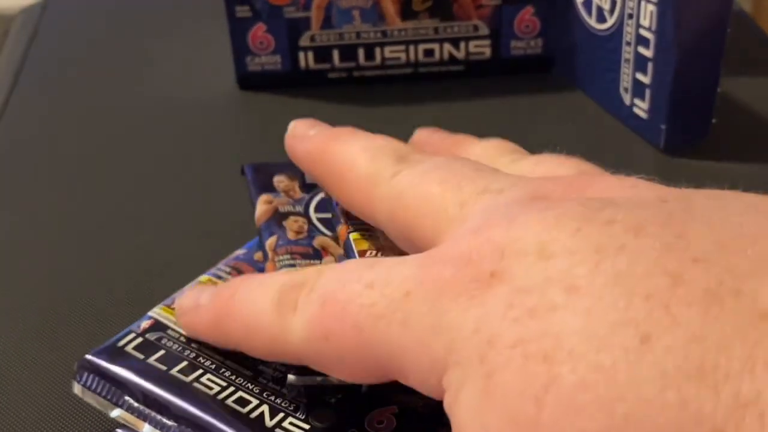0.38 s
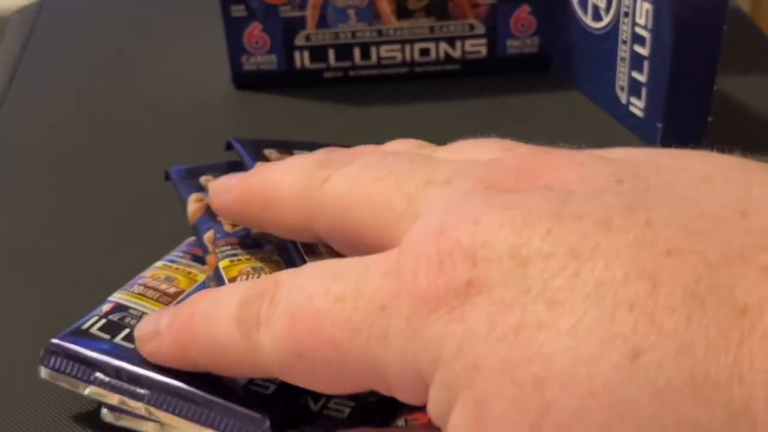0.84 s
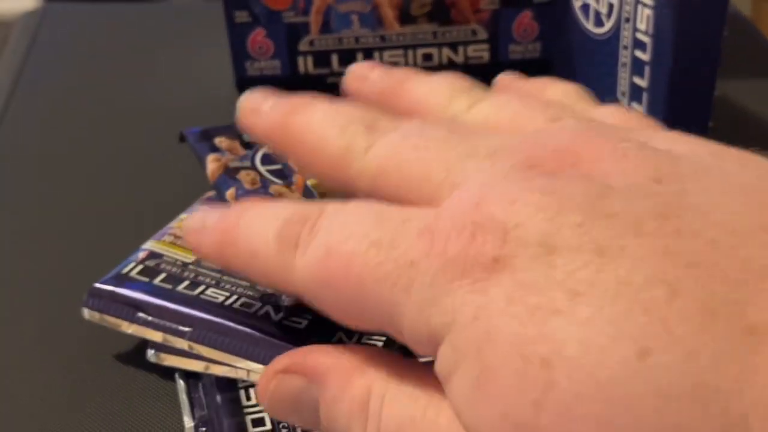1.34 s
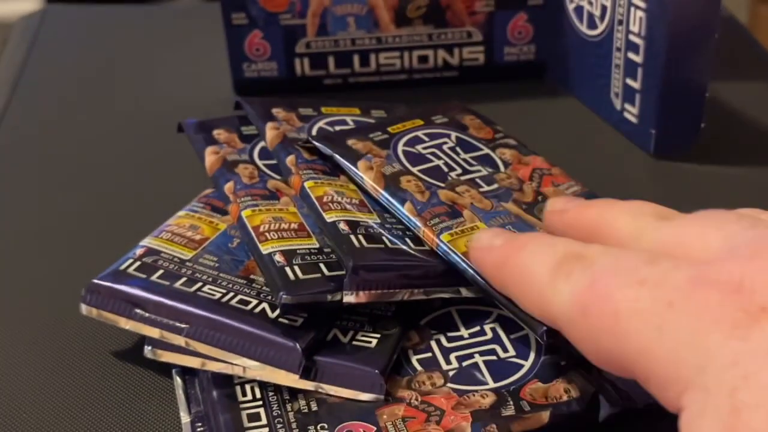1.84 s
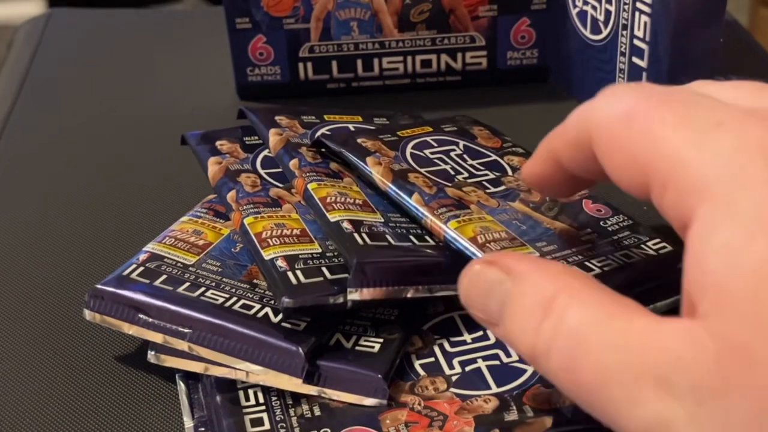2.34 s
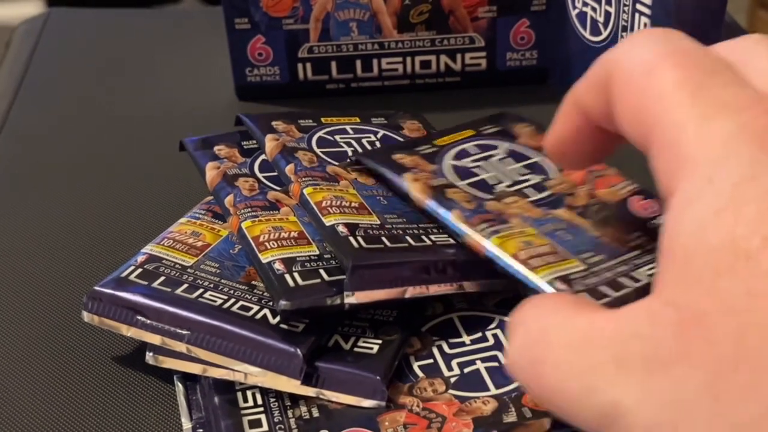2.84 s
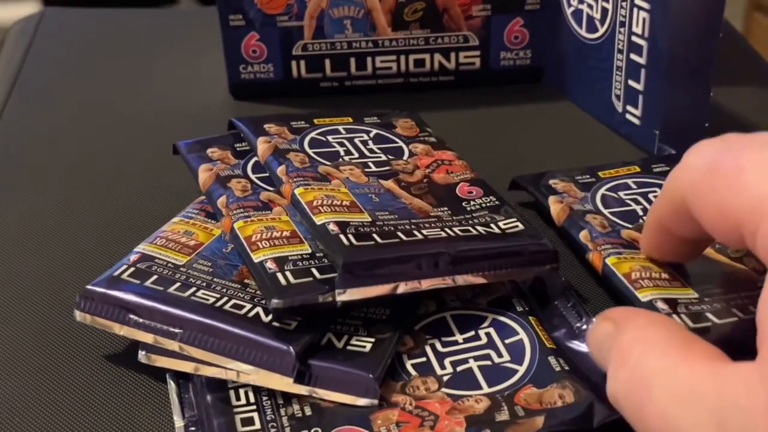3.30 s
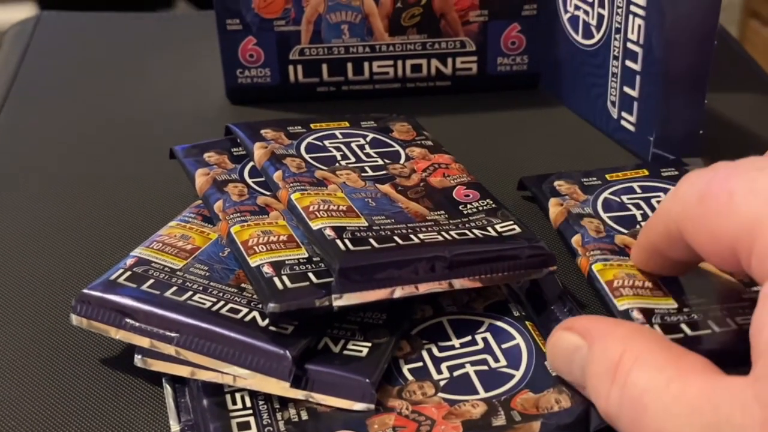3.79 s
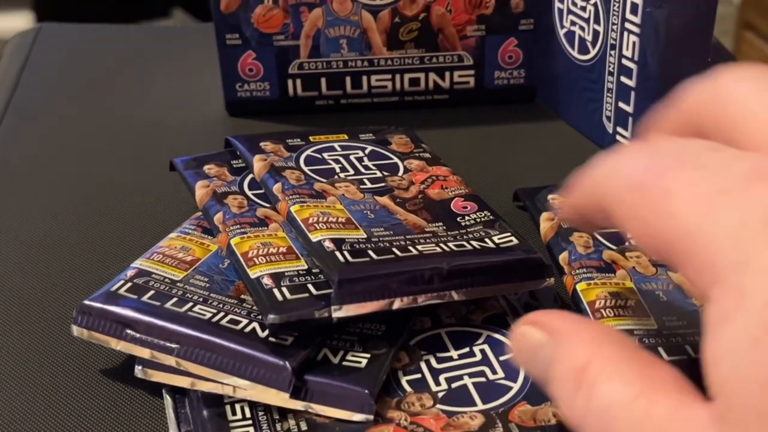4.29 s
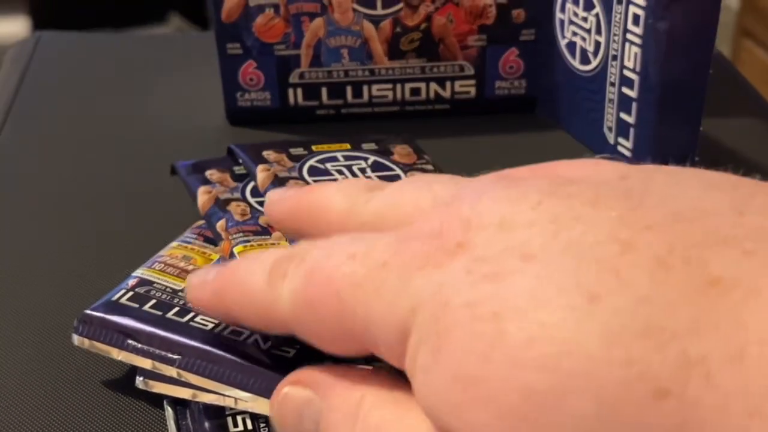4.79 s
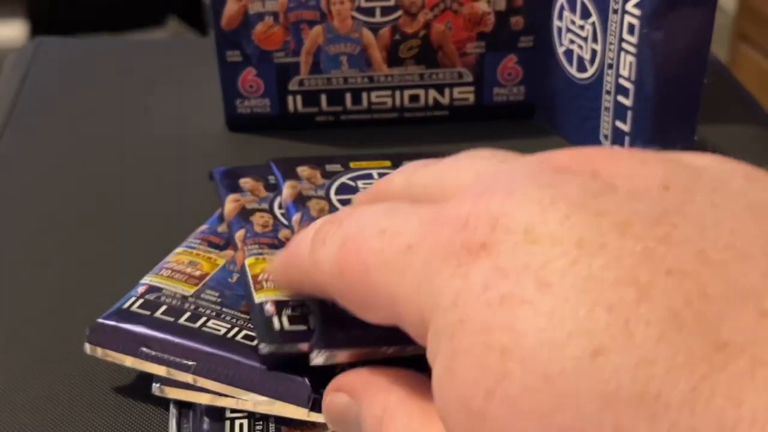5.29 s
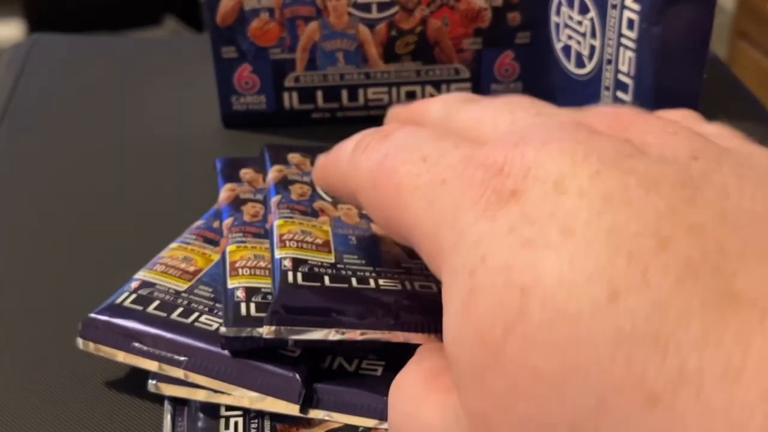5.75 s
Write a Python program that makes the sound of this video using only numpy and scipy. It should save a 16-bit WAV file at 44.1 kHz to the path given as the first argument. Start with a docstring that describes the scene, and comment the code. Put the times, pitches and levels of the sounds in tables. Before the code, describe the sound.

Close up in a quiet room, a hand rubs and shuffles a pile of foil packs. Dense crinkling and bright snaps come first, then thin out to sparse rustles; a pack lands with a soft knock around three seconds, near-silence follows, and moderate crinkling returns at the end. Faint low room rumble throughout, close stereo microphone.

```python
"""A hand presses, shuffles and slides foil-wrapped card packs on a rubber mat in a quiet room.
Skin, foil and mat rub with a hiss of shaped noise; creases in the foil snap as brief rings and noise bursts.
Packs land and the hand pats the pile: clicks set the modes of pack, mat and table ringing.
A rubbing pack squeaks in faint wavering tones; filtered noise makes the room's rumble and a hum.
Two microphone ports close together pick it up, with short diffuse echoes and a faint hiss between strokes."""
import sys
import numpy as np
from scipy import signal
from scipy.fft import rfft, irfft
from scipy.io import wavfile

SR = 44100
rng = np.random.default_rng(int(sys.argv[2]) if len(sys.argv) > 2 else 0)


def volts_from_decibels(level):
    """Turn decibel levels (scalar or array-like) into linear amplitude factors."""
    exponent = np.asarray(level, float) / 20
    return 10 ** exponent


def wrap_up_sound(samples):
    """Save the sound to the file named by the first command line argument, as 16-bit audio."""
    columns = np.atleast_2d(samples).T
    # keep every value between -1 and 1, then stretch to whole-number steps
    tamed = np.clip(columns, -1, 1)
    steps = np.round(tamed * 32767).astype(np.int16)
    wavfile.write(sys.argv[1], SR, steps)


N = 259749   # length [samples]
FIRM_DB = -48   # rubbing level that counts as firm
ROOM_DB = -28.5   # echoes re direct sound


def rms_one(x):
    """Scale to unit rms."""
    return x / np.sqrt(np.mean(x ** 2) + 1e-20)


def band(x, low_hz, high_hz):
    """Band-pass."""
    edges_hz = [low_hz, min(high_hz, .45 * SR)]
    return signal.sosfilt(signal.butter(2, edges_hz, "band", fs=SR, output="sos"), x)


def at_hz(points, column):
    """A table column on the FFT grid, straight on a log-frequency axis."""
    hz = np.maximum(np.arange(N // 2 + 1) * SR / N, 1)
    points = np.array(points)
    return np.interp(np.log(hz), np.log(points[:, 0]), points[:, column])


def drift(rate_hz):
    """Slow chance of unit rms: noise through a double low-pass."""
    r = np.exp(-2 * np.pi * rate_hz / SR)
    slow = signal.lfilter([1], [1, -2 * r, r * r], rng.standard_normal(N + SR))
    return rms_one(slow[SR:])   # skips the first second, while the filter settles


def ring(clicks, hz, t60):
    """A unit click sets a decaying sine of height 1 ringing, as in a struck resonance."""
    r = volts_from_decibels(-60 / (t60 * SR))
    w = 2 * np.pi * hz / SR
    return signal.lfilter([0, np.sin(w)], [1, -2 * r * np.cos(w), r * r], clicks + 1e-18)


def swell(t, rise_s, fall_s):
    """Exponential rise to 1 at t = 0, exponential fall."""
    return np.exp(np.where(t < 0, t / rise_s, -t / fall_s))


def hand():
    """Strokes swell and fade and add in power over a faint steady hiss: level and treble, in dB."""
    # strokes of the hand: (time of peak [s], rubbing level [dB], rise [ms], fall [ms],
    # treble re rubbing [dB])
    strokes = [(0.031, -46.5, 32, 31, -7), (0.128, -59.5, 184, 28, -3), (0.195, -64, 57, 21, -3),
               (0.264, -57.5, 67, 39, -10), (0.355, -53, 20, 54, -10), (0.407, -49.5, 29, 52, -10.0),
               (0.48, -42, 20, 51, -8.0), (0.571, -46, 57, 57, -9), (0.63, -37.5, 34, 55, -13),
               (0.72, -47.5, 40, 34, -11), (0.778, -42.5, 28, 49, -18), (0.868, -44.5, 21, 56, -6),
               (0.966, -48.5, 34, 24, -12), (1.014, -43, 58, 27, -8), (1.116, -42.5, 48, 47, -11),
               (1.208, -46, 18, 57, -10.0), (1.295, -53.5, 30, 42, -9), (1.386, -54.5, 17, 42, -11),
               (1.475, -62.5, 46, 85, -6), (1.634, -55, 93, 170, -11.5), (1.775, -55, 47, 31, -6.5),
               (1.884, -59.5, 100, 152, -1.5), (1.966, -54.5, 88, 28, -1), (2.05, -66.5, 21, 40, 8),
               (2.136, -59, 60, 75, -10.5), (2.306, -71.5, 100, 197, -0.5), (2.418, -58.5, 31, 77, -6),
               (2.565, -64.5, 24, 20, -9.0), (2.637, -58.5, 23, 67, -7.0), (2.728, -55.5, 18, 55, -3),
               (2.883, -66, 180, 304, 2.5), (2.972, -52.5, 35, 55, -2), (3.079, -43.0, 26, 15, -9),
               (3.135, -51.0, 47, 31, -11), (3.224, -57.5, 170, 39, -5.0), (3.363, -55.5, 40, 35, -3.5),
               (3.463, -80, 29, 26, -3), (3.53, -63.5, 24, 21, -21), (3.619, -68, 16, 20, -27),
               (3.729, -62.5, 11.5, 45, -9), (3.822, -69.5, 21, 16, -4), (3.878, -53, 22.3, 37, -3),
               (4.005, -68, 40, 20, -7.5), (4.11, -81, 32, 22, 0.5), (4.203, -66.5, 28, 44, -9.0),
               (4.436, -75.5, 65, 85, -1.5), (4.57, -57, 78, 200, -9), (4.74, -65, 123, 110, 1.5),
               (4.87, -68.5, 48, 104, 6), (4.917, -61.5, 76, 81, -7), (5.015, -47.5, 48, 27, -9),
               (5.111, -55.5, 60, 28, -6.0), (5.191, -46.5, 41, 31, -3), (5.326, -49.5, 116, 39, -1),
               (5.397, -52.5, 83, 32, -1), (5.502, -51, 63, 29, -2), (5.584, -57, 58, 34, -5.0),
               (5.681, -52, 37, 33, -6.5), (5.722, -70.5, 18, 56, -7.5), (5.888, -66, 66, 16, -9)]
    roundness = 1.5   # 1 = pointed strokes, 2 = bell-shaped
    edge_db = 10   # drop after one rise or fall time
    floor_db, floor_treble_db = -86.5, -6   # faint steady microphone hiss left between strokes; its treble re that
    t = np.arange(0, N + 32, 32) / SR
    s, db, rise_ms, fall_ms, treble_db = np.transpose(strokes)[:, :, None]
    side_ms = np.maximum(np.where(t < s, rise_ms, fall_ms), 8)
    away = 1000 * np.abs(t - s) / side_ms
    power = volts_from_decibels(2 * (db - edge_db * away ** roundness))
    level = power.sum(0) + volts_from_decibels(2 * floor_db)
    treble = (power * volts_from_decibels(2 * treble_db)).sum(0) + volts_from_decibels(2 * (floor_db + floor_treble_db))
    return [np.interp(np.arange(N) / SR, t, 10 * np.log10(p)) for p in (level, treble)]


def crackle(usual_per_s=400, fade_s=0.0012):
    """Tiny creases give way in clumps, each a dry broadband burst of a few milliseconds."""
    sizes = np.minimum(rng.exponential(1, N), 4)
    sizes = volts_from_decibels(0.0 * sizes)   # at 0 dB of spread all bursts are born alike
    born = rng.random(N) < usual_per_s * volts_from_decibels(5.0 * drift(25)) / SR
    t = np.arange(-150, 150) / SR
    bursts = signal.fftconvolve(sizes * born, swell(t, fade_s, fade_s), "same")
    return rms_one(bursts * rng.standard_normal(N))


def rubbing(level_db, treble_db, low_edge_hz=1650, treble_edge_hz=8000, trim_db=-1.0):
    """Skin, foil and mat slide on each other: a hiss in three registers that carries the fine crackle."""
    # microphone colour on the hiss, close by: (frequency [Hz], level [dB per Hz])
    colour = [(100, -36), (200, -8), (350, 6), (800, 1), (1200, -3), (1600, -0.5), (2200, -2.8),
              (2800, -5.5), (3500, -2.5), (5600, -10), (6500, -7.5), (8300, -10), (11700, -13.5),
              (15500, -14.5), (16300, -22)]
    firmer_db = level_db - FIRM_DB
    # the low register gains less from firmer rubbing, and comes and goes on its own
    low_db = level_db - 13.5 - 0.35 * firmer_db + 2 * drift(2.7)
    grain_db = np.maximum(1 + 0.6 * firmer_db, -7.0)   # crackle re hiss
    hiss = rng.standard_normal(N) * volts_from_decibels(1.3 * drift(35))   # flickers
    raw = hiss + volts_from_decibels(grain_db) * crackle()
    raw /= np.sqrt(1 + volts_from_decibels(2 * grain_db))
    hz = np.arange(N // 2 + 1) * SR / N
    low = 1 / (1 + (hz / low_edge_hz) ** 14)
    treble = 1 - 1 / (1 + (hz / treble_edge_hz) ** 6)
    shares = np.array([1 - low - treble, treble, low])   # the registers add up without gaps
    parts = irfft(rfft(raw) * volts_from_decibels(at_hz(colour, 1)) * shares, N)
    levels_db = [level_db, treble_db, low_db]
    return sum(volts_from_decibels(db + trim_db) * rms_one(part) for db, part in zip(levels_db, parts))


def background():
    """Building rumble in slow swells and a wavering hum (noise in a resonance), nearly alike at both ports."""
    # rumble of the room, relative: (frequency [Hz], level [dB per Hz])
    rumble_shape = [(12, -27), (20, -7.5), (49, 4.5), (75, 2.5), (121, -5.5), (172, -14), (264, -14),
                    (604, -37), (709, -32.5), (900, -27.5), (1170, -56.5), (1980, -120)]
    rumble_db, hum_db, hum_hz = -60, -71, 116.2
    mid, side = irfft(rfft(rng.standard_normal((2, N))) * volts_from_decibels(at_hz(rumble_shape, 1)), N)
    apart = band(side, 60, 1000) * volts_from_decibels(-14.0) * np.array([[1], [-1]])
    rumble = volts_from_decibels(rumble_db + 0.87 * drift(6.3)) * rms_one(mid + apart)
    hum = rms_one(ring(rng.standard_normal(N), hum_hz, 0.94))
    return rumble + volts_from_decibels(hum_db) * hum


def snaps(rows, usual_length_s=0.00079, spread=0.42, rasp=1.9, trim_db=(3.5, 3.5, -0.7, 3.5)):
    """A buckle runs along a crease for a millisecond: treble first, then the foil facets ring, the pack last."""
    out = np.zeros(N + 768)
    t = np.arange(768) / SR - .004
    chance = rng.standard_normal((len(rows), 2, 768))   # noise; its first values also serve as single draws
    for (s, peak_db, hz, treble_db, body_db), (a, b) in zip(rows, chance):
        length = usual_length_s * np.exp(0.18 * a[0])   # creases differ in length
        facet_hz = hz * np.exp(spread * b[:3])
        facets = sum(np.sin(2 * np.pi * facet_hz[k] * t + 3 * b[k + 4]) for k in range(3))
        tone = np.sin(2 * np.pi * hz * t + 3 * b[8]) + 0.15 * facets + rasp * band(b, 1840, 4240)
        main_ring = tone * np.exp(-(t / length) ** 2)
        upper_ring = band(a, 4300, 10000) * np.exp(-((t + 0.0001) / length) ** 2)
        treble = band(b, 4300, 13500) * np.exp(-((t + 0.00081) / length) ** 2)
        body = band(band(a, 630, 1090), 460, 1800) * swell(t - .0006, 0.00047, 0.0014)
        # the upper ring follows part of the treble's swing, with chance of its own
        upper_db = -4.5 + 0.57 * treble_db + 6.5 * a[1]
        parts = [main_ring, upper_ring, treble, body]
        i = round(s * SR) - round(-t[0] * SR)
        for part, db, trim in zip(parts, [0, upper_db, treble_db, body_db], trim_db):
            out[i:i + 768] += volts_from_decibels(peak_db + db + trim) * part / np.abs(part).max()
    return out[:N]


def small_snaps(level_db, count=360, firm_per_s=45):
    """Lesser creases give way at random, more often (up to firm) and louder the firmer the rubbing."""
    when, luck, pitch = rng.random((count, 3)).T
    size, treble, body = rng.standard_normal((count, 3)).T
    s = .01 + when * (N / SR - .03)
    here_db = level_db[(s * SR).astype(int)]
    peak_db = here_db + 5.5 + 3.0 * size
    ring_hz = 1900 * 2.4 ** pitch
    rows = np.transpose([s, peak_db, ring_hz, -15 + 5.4 * treble, -17 + 2.4 * body])
    rate_per_s = firm_per_s * np.minimum(volts_from_decibels(2 * (here_db - FIRM_DB)), 1)
    return snaps(rows[luck * count * SR / N < rate_per_s])


def knocks(contact_hz=1500, trim_db=-3.5):
    """Each soft blow strikes every mode with a strength of its own; a hand on the pack shortens the ring."""
    # a pack lands and bounces, the hand pats the pile, before trim:
    # (time [s], peak level [dB], freedom to ring [0-1])
    blows = [(2.154, -42.5, 0), (3.058, -36, 0.53), (3.074, -40.5, 0.44), (3.11, -44.5, 0.47),
             (3.129, -41, 0.43), (5.166, -44.5, 0), (5.322, -39, 0.11)]
    # modes of pack, mat and table left free: (frequency [Hz], level re blow [dB], 60 dB decay time [s])
    modes = [(123, -5.5, 0.07), (252.3, -2, 0.31), (480, 0, 0.079), (748, 2.5, 0.11), (1010, -4, 0.1)]
    out = np.zeros(N)
    strength_db = rng.normal(0, 2.5, (len(blows), len(modes)))
    for (s, peak_db, free), own_db in zip(blows, strength_db):
        i = round(s * SR)
        click = np.zeros(min(SR // 2, N - i))
        click[0] = volts_from_decibels(peak_db + trim_db)
        for (hz, level_db, t60), db in zip(modes, own_db):
            out[i:i + len(click)] += volts_from_decibels(level_db + db) * ring(click, hz, t60 * np.clip(free, .1, 1))
    return signal.lfilter(*signal.butter(1, contact_hz, fs=SR), out)   # soft contact dulls the blow


def squeaks(usual_hz=1045):
    """A pack rubs on the mat with short, faint, slightly wavering tones: sines under bell-shaped swells."""
    # squeaks on the mat: (time of peak [s], peak level [dB], length [s])
    rubbed_tones = [(3.13, -57, 0.048), (3.189, -54.5, 0.024), (3.395, -71, 0.04), (3.954, -71, 0.025),
                    (4.236, -71, 0.036)]
    t = np.arange(N) / SR
    hz = usual_hz * (1 + 0.0095 * drift(24))
    tone = np.sin(2 * np.pi * np.cumsum(hz) / SR)
    return tone * sum(volts_from_decibels(db) * np.exp(-(2 * (t - s) / length) ** 2) for s, db, length in rubbed_tones)


def room(x, t60_s=0.045):
    """Nearby boxes and walls send back short diffuse tails, one shared by the ports and one for each."""
    t = np.arange(SR // 3) / SR
    tails = rng.standard_normal((3, len(t))) * volts_from_decibels(-60 * t / t60_s) * (t > .002)
    tails /= np.sqrt(np.sum(tails ** 2, axis=1, keepdims=True))
    return volts_from_decibels(ROOM_DB) * signal.fftconvolve(x[None], tails, axes=1)[:, :N]


def ports(near, diffuse):
    """The ports differ in level and phase by frequency; where they are less alike, each hears its own echoes."""
    # the two microphone ports: (frequency [Hz], left minus right [dB], likeness [0-1])
    port_balance = [(100, 1.5, 0.94), (714, 0, 0.8), (1330, 4.5, 0.49), (1310, -6.5, 0.6),
                    (1570, -10.5, 0.4), (1710, -7, 0.8), (1800, -4.5, 0.94), (2480, -2, 0.98),
                    (2950, -0.2, 0.98), (5100, 0, 1), (5400, -1.5, 0.78), (6700, 0.5, 1), (8800, 0.4, 0.99),
                    (12000, -0.2, 1), (15000, .1, 0.9)]
    # phase between the ports: (frequency [Hz], lead of the left [radians])
    port_lead = [(1400, .1), (1460, 2.9), (1640, 3.0), (1700, .15), (2950, .25), (4400, 0), (5000, 0),
                 (6000, -.8), (7000, -1.6), (8400, -3.14), (10000, -4.7), (11500, -5.9), (12800, -6.7),
                 (14200, -8.4), (15200, -9.4)]
    half = np.exp(.5j * at_hz(port_lead, 1)) * volts_from_decibels(at_hz(port_balance, 1) / 2)
    alike = np.clip(at_hz(port_balance, 2), 0, 1)
    tails = rfft(diffuse)
    both = (rfft(near) + tails[0]) * np.array([half, 1 / half]) * np.sqrt(alike)
    own = tails[1:] * volts_from_decibels(-ROOM_DB) * np.sqrt(1 - alike)   # raised back to the level of the direct sound
    return irfft(both + own, N)


def scene():
    """Everything near passes the ports; the rumble fills the room."""
    # creases that buckle, before trim: (time [s], peak level [dB], facet ring [Hz],
    # treble re peak [dB], pack body re peak [dB])
    buckles = [(0.0088, -46, 3380, -6.5, -5.5), (0.0247, -32, 2120, -8.0, -16),
               (0.0266, -32, 2110, -6, -15), (0.0517, -41.5, 2240, -8, -7.5),
               (0.1058, -40.5, 4600, 13.5, -21.5), (0.11, -39.5, 3270.0, -7, -20.5),
               (0.1238, -42.5, 2950.0, -16.0, -8), (0.1313, -36.5, 3170, -19, -33),
               (0.1969, -35, 2080, -7.5, -20.5), (0.2873, -39.5, 2230, -13.0, -16.5),
               (0.3436, -33, 3600, -13, -16), (0.3568, -37.5, 3380, -6.5, -20.5),
               (0.389, -36.5, 1880, -7, -16), (0.402, -36.5, 2560, -14, -12),
               (0.4084, -28.0, 4120, -4.5, -9), (0.429, -32.5, 2070.0, -19, -16),
               (0.4661, -27.5, 1950, -5, -11.5), (0.4739, -26, 3380, 3.0, -7.5),
               (0.4823, -25.5, 2120, -12, -16), (0.4859, -25, 2110.0, -14, -7.5),
               (0.5173, -31.0, 3900.0, -4, -8.5), (0.5598, -23, 3210, -2.0, -26.5),
               (0.5714, -35.5, 2050.0, -12, -12), (0.6094, -23.5, 3700, 0.5, -23.5),
               (0.6193, -33.5, 3230.0, 6.5, -21.5), (0.626, -20.5, 2200, -1, -21.5),
               (0.6318, -19.5, 2090, -13, -27.5), (0.6383, -24, 4050, -8.5, -17.5),
               (0.6487, -33.5, 2240.0, 1, -15.5), (0.6679, -40, 4500, 3.0, -16.0),
               (0.6792, -35.5, 4690.0, 5, -15.5), (0.6957, -40.5, 4720, -2.0, -13),
               (0.7121, -29, 3100, 0.5, -22.5), (0.7263, -30, 4730, -2.5, -18.5),
               (0.7433, -29, 3060.0, -4, -28.5), (0.7554, -38.5, 3170.0, -8.5, -12.5),
               (0.7608, -33.5, 3010.0, -9, -29.0), (0.771, -29, 2300, -11.5, -22.5),
               (0.7735, -37.5, 2300.0, -12, -22.5), (0.7776, -32.5, 2130.0, -9, -23.5),
               (0.7802, -27, 2110.0, -21, -24), (0.7831, -36, 3145, -4.0, -22),
               (0.7937, -23.5, 2300, -14, -24), (0.8015, -24, 2100, -14, -26), (0.808, -34, 4370.0, 0, -14),
               (0.8276, -26.0, 3360.0, 0.5, -29), (0.8368, -31, 3370, -7, -19.5),
               (0.8547, -30, 2280.0, -9.5, -21.5), (0.8593, -24, 4500, -3.5, -29.5),
               (0.8627, -30, 3270, -4, -23), (0.871, -38.5, 2230, -8.5, -18.5),
               (0.8743, -24.5, 4530, -0.5, -26.5), (0.8799, -35, 3370, -5.5, -16.5),
               (0.8859, -26.5, 2410, -10, -27.5), (0.8976, -25.5, 2660, -4.5, -23.5),
               (0.9224, -29.5, 4360, 4.5, -24.5), (0.9345, -37.5, 3580, -1.5, -9.5),
               (0.9603, -31.5, 3254, -13, -17), (0.9636, -35.0, 2107, -19, -9.5),
               (1.0049, -36.5, 3880.0, 2.5, -11.5), (1.0131, -38.5, 3590, -11, -10),
               (1.0174, -32.5, 4590.0, -3.5, -8.5), (1.0213, -18.0, 3510, -1.5, -21.5),
               (1.0845, -39, 2170.0, -6, -15.5), (1.0995, -30.0, 3700.0, -9, -7),
               (1.1208, -34, 3500, -6, -8), (1.1246, -36, 4440.0, -5.5, -11.5),
               (1.1348, -35, 3730.0, 6, -11), (1.1567, -42.5, 2000.0, 6, -17),
               (1.161, -34.5, 1830, -0.5, -9), (1.1941, -38.5, 4010.0, -11.0, -22.5),
               (1.2032, -30, 3550, -5.5, -25), (1.2207, -37.5, 1900, -1, -1), (1.2469, -39, 2200.0, -6, -7),
               (1.261, -39.5, 2090.0, -10, -14), (1.2897, -38.5, 2170.0, -15.5, -12.5),
               (1.2994, -26.0, 3000, 1.5, -15), (1.3773, -23.5, 2110, -8, -15.5),
               (1.3834, -32.5, 3300, -4.5, -12), (1.4684, -35.5, 3860, -5.5, -17),
               (1.7738, -43, 1900, -6.5, -3), (1.8603, -31.5, 2350, -10, -13),
               (1.9203, -25.5, 3400, 9.0, -20.5), (1.962, -38, 3960, 6, -16.5),
               (1.9655, -30.0, 3130, -1.5, -14.5), (2.0488, -50.5, 3680, -4, -13),
               (2.1051, -43.5, 2070.0, -20, -25), (2.1104, -33, 4130, 4, -19),
               (2.1267, -26.5, 2900, -0.5, -17.0), (2.1415, -39.0, 2000.0, -20, -9),
               (2.155, -44.5, 1920.0, -14.5, -0.5), (2.7166, -35.5, 4690.0, 14.5, -18.5),
               (2.7383, -41, 3080, -7, -15), (2.8605, -51, 2480, -12.5, -18),
               (2.8924, -47.5, 1700, -10.5, 4.5), (2.921, -53.5, 1800, -6, 0.5),
               (2.9642, -19.5, 3170, -6, -12), (3.0381, -45, 2170, -10, -9.5),
               (3.054, -37.5, 2480.0, -20, -2.5), (3.0581, -34, 2150.0, -11.5, 4),
               (3.0773, -34, 2520.0, 1.5, -9), (3.0822, -30.5, 3270, 1, -16),
               (3.092, -29.5, 2290, -5.5, -19), (3.1112, -30, 3240, -5.0, -7.5),
               (3.1548, -27, 2980, 1, -13.5), (3.5004, -48.0, 2150, -3.5, -20),
               (3.8877, -49, 2710, 2, -2.5), (4.2055, -56, 3200, -16, -21),
               (4.8714, -42.5, 4400, -11.0, -8), (4.9498, -34.5, 1860, -1.5, -8.0),
               (4.9863, -41.5, 3230.0, -8.0, -14), (4.9929, -33.0, 3030, -7.0, -6),
               (5.0105, -42, 3340.0, -9.0, -3), (5.0161, -39.5, 3510.0, -2.5, -4.5),
               (5.0308, -43.5, 3490, -13.5, -5.5), (5.038, -37, 2220.0, -10, -4),
               (5.1062, -43.5, 3040, -3, -20.5), (5.1575, -38.5, 1890.0, -6.0, -18),
               (5.1679, -29.5, 3300, 1.0, -7.5), (5.1871, -47.5, 1810.0, 10.0, -10),
               (5.1904, -24, 3370, -8, -20.5), (5.1969, -38.0, 1690, -9.5, -10),
               (5.278, -51, 3730, -4, -17.5), (5.3112, -39.0, 3060.0, -7.0, -11),
               (5.3198, -39.5, 3600, 4.5, -12), (5.3234, -24.5, 4000, -5.5, -14),
               (5.356, -35, 4120, -0.5, -7.5), (5.3702, -28, 2110.0, -13.5, -19.0),
               (5.3814, -38.5, 2070.0, -9, -21.5), (5.3982, -41, 2050.0, -10.5, -26),
               (5.4048, -37, 3820, -5, -25.5), (5.488, -33.0, 3140.0, -10, -19),
               (5.5032, -32.5, 4690.0, 0.5, -17), (5.5071, -42.5, 3960, 2, -5.5),
               (5.5146, -38.5, 1940, -7, 1.0), (5.5956, -43, 2170, -18, -17.5),
               (5.6561, -36.5, 3740, 14, -8), (5.68, -30.5, 3530, 2, -7), (5.6904, -48, 2260, -5, -16.5)]
    level_db, treble_db = hand()
    near = snaps(buckles) + rubbing(level_db, treble_db) + knocks() + squeaks()
    far = background()
    near = near + small_snaps(level_db)
    return ports(near, room(near)) + far


def band_limit(x):
    """A steep low-pass at the top of the band."""
    return signal.sosfilt(signal.butter(12, 16680, fs=SR, output="sos"), x)


def record(dry):
    """A steep low-pass cuts the top, 50 dB down from 16.4 kHz."""
    cut = signal.sosfilt(signal.cheby2(10, 50, 16400, fs=SR, output="sos"), dry)
    return band_limit(cut)


dry = scene()
out = record(dry)
wrap_up_sound(out)
```